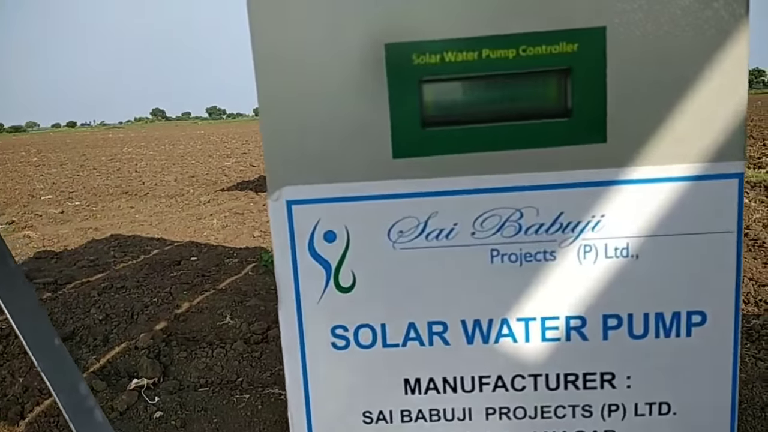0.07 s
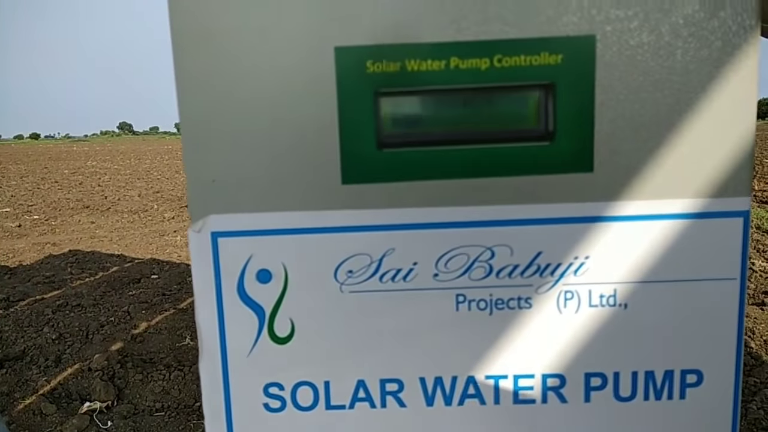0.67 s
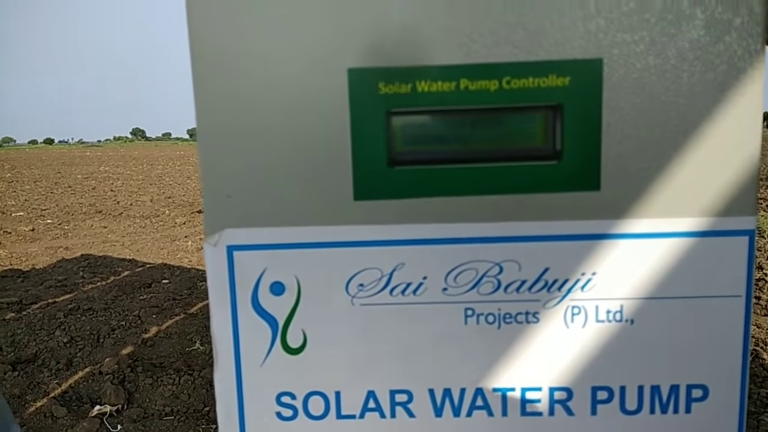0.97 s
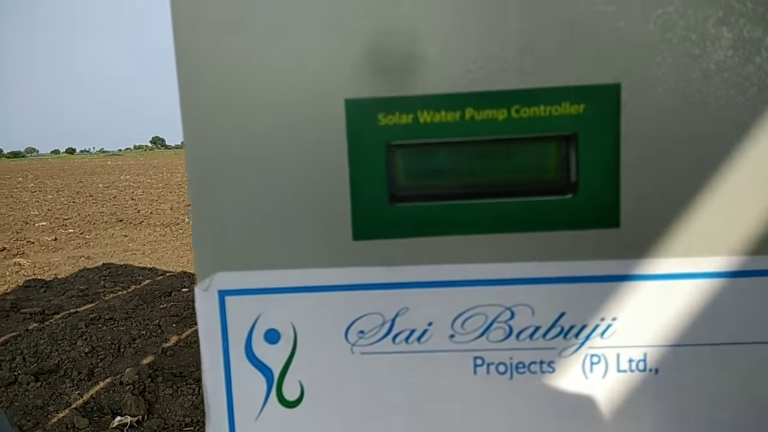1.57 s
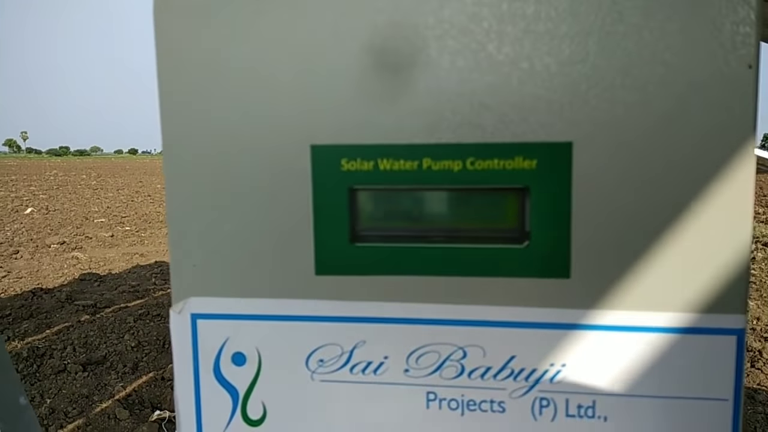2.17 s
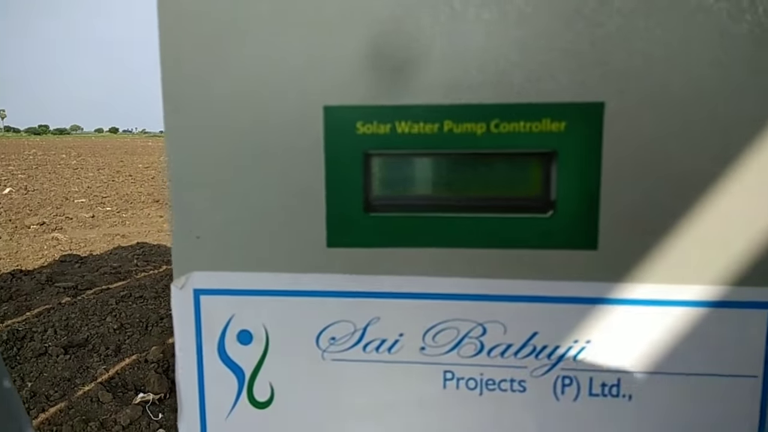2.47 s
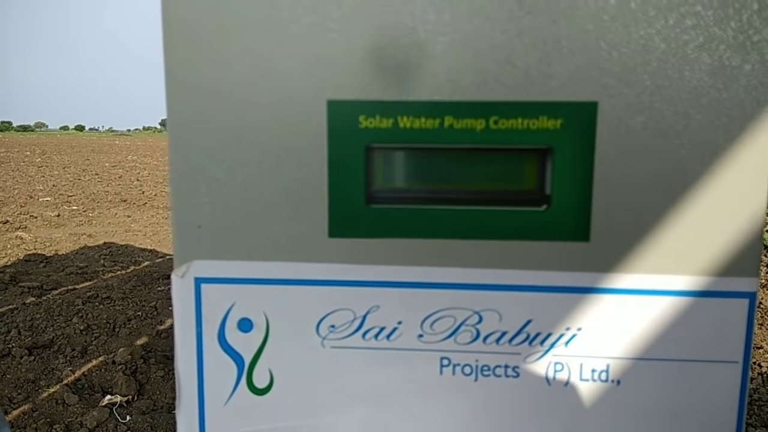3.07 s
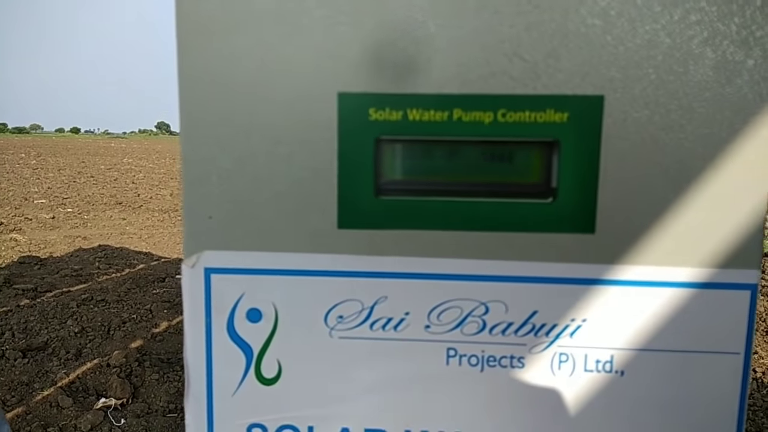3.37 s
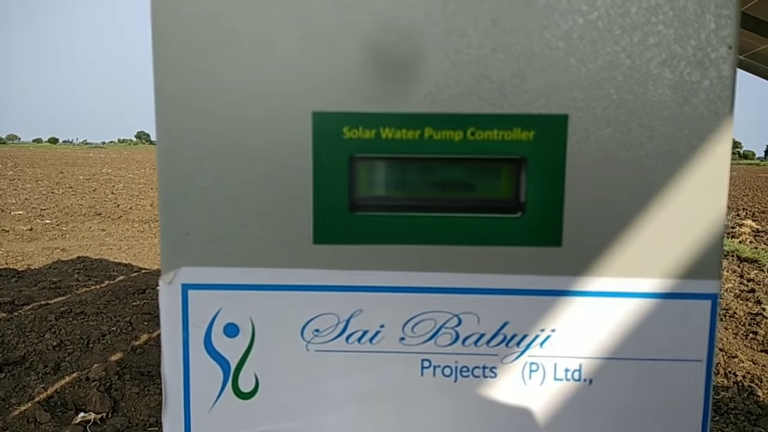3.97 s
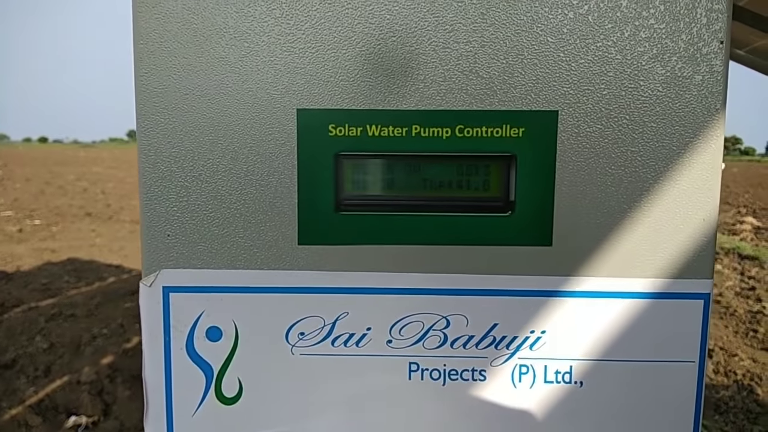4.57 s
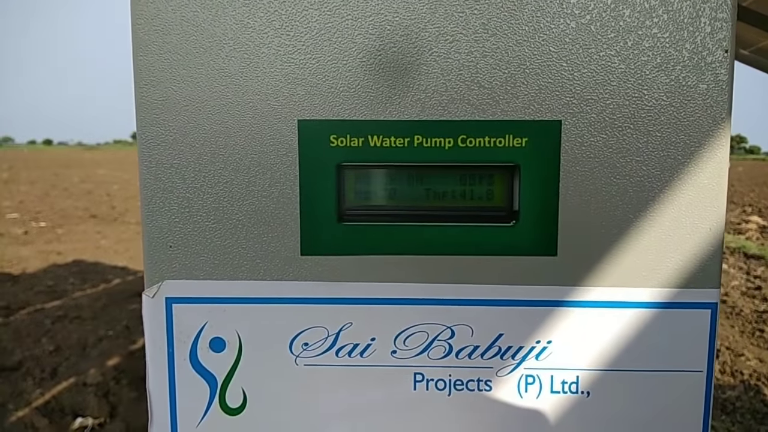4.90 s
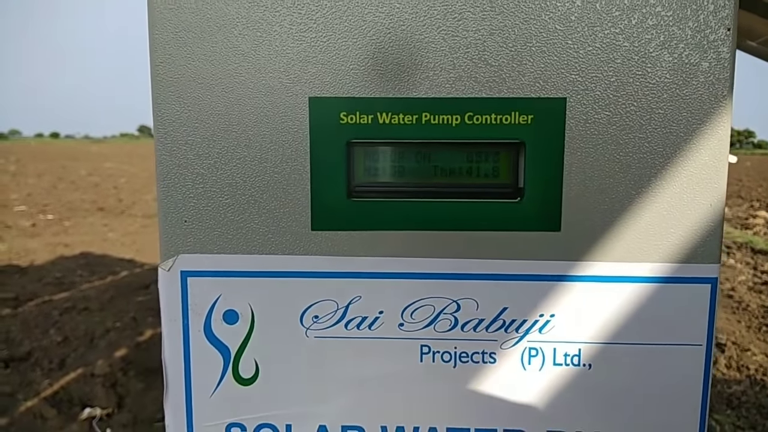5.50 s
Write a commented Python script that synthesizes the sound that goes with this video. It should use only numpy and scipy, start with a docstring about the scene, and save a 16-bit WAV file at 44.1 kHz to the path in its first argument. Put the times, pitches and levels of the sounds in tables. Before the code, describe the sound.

Wind buffets the microphone in irregular low rumbles and short thumps, mostly on the left, out in an open field. Alongside it, a pump's stream of water runs without a break, bubbling, plopping and spraying onto the soil. Heard from beside a metal cabinet, the water sounds slightly hollow, and the electronics whine faintly. The gurgle eases a little toward the end.

```python
"""A gurgling rush of water gushes from a pump's outlet pipe and spatters on the ground in an open field.
Bubbles ring, drops tick and lumps of water slap down. The microphones stand close to a metal control
cabinet, whose hollows colour the rush and whose electronics whine faintly.
Gusts of wind rumble and thump on the two microphone openings (ports), the left one harder."""
import sys
import numpy as np
from scipy import signal
from scipy.fft import rfft, irfft
from scipy.io import wavfile
from scipy.ndimage import uniform_filter1d, map_coordinates

SR = 44100
rng = np.random.default_rng(int(sys.argv[2]) if len(sys.argv) > 2 else 0)


def digitize_waveform(pressure):
    """Quantize a signal to 16-bit integers and store it at the path in sys.argv[1].

    Rows of a 2-D input are taken as channels; values are limited to [-1, 1].
    """
    field = np.atleast_2d(pressure).T
    bounded = np.clip(field, -1, 1)
    quanta = np.round(bounded * 32767).astype(np.int16)
    wavfile.write(sys.argv[1], SR, quanta)


N = 244314
TIME = np.arange(N) / SR
FREQ = np.fft.rfftfreq(N, 1 / SR) + 1e-3

# the slowly changing strength of the stream: t/s, relative gurgle level/dB, relative spray level/dB
FLOW = [(0, 6, 5.5), (0.75, 6.5, 2), (1.1, 7.5, 3.5), (1.85, 8.5, 4.5), (2.14, 8.5, -0.5), (2.55, 10.5, 2),
        (2.95, 7, 2.5), (3.75, 9, 5), (4.0, 6, 1.5), (4.8, 3, 4), (5.07, 2.5, 0), (5.35, 5.5, 5.5),
        (5.54, 3.5, 2)]
# lumps of water slapping down: t/s, level over the spray/dB, decay/s
SLAPS = [(0.035, 6.5, 0.0073), (0.33, 0, 0.061), (1.648, 7.5, 0.022), (2.195, 6, .005), (2.205, 5, 0.096),
         (2.494, 8.5, 0.009), (2.642, 6.5, 0.0054), (2.857, 7, 0.011), (3.261, 6.5, 0.039),
         (4.234, -2, 0.0038), (4.519, 9, 0.0036), (4.553, 13, 0.0025), (5.124, 6.5, 0.0045),
         (5.178, 9, 0.0081), (5.286, 15.5, 0.0049), (5.381, 4, 0.0065)]
# the largest pockets of air the stream gulps: t/s, level over the gurgle/dB, f/Hz, decay/s
AIR_POCKETS = [(0.148, 13.5, 1980, 0.0095), (0.934, 12, 1670, 0.0062), (1.046, 13, 2700, 0.011),
               (1.08, 16.5, 2950, 0.0094), (1.078, 21, 890, .009), (1.262, 12.5, 1650, 0.01),
               (1.288, 15, 860, .008), (1.484, 12, 3220, 0.0086), (1.673, 8.5, 1900, 0.085),
               (2.018, 15, 1200, .012), (2.023, 12, 2270, 0.013), (2.08, 7, 2000, 0.038),
               (2.142, 11, 1650, 0.0078), (2.194, 20.5, 2010, 0.0054), (2.215, 16.5, 3200, 0.017),
               (2.222, 13.5, 970, .012), (2.355, 16, 1685, 0.0094), (2.495, 14.5, 1890, 0.013),
               (2.457, 14, 905, .009), (2.527, 11, 960, .012), (2.587, 13.5, 1800, 0.0059),
               (2.643, 15.5, 2900, 0.0082), (2.852, 11.5, 3160, 0.014), (3.039, 18, 1770, 0.0036),
               (3.038, 19, 1070, .008), (3.07, 19, 917, .011), (3.158, 15, 895, 0.019),
               (3.55, 8, 3470, 0.0033), (3.59, 12, 2810, 0.0048), (3.702, 9, 1680, 0.0081),
               (3.771, 18, 955, .008), (4.094, 12.5, 1660, 0.02), (4.106, 11, 3160, 0.03),
               (4.176, 11.5, 3260, 0.0098), (4.233, 15.5, 3140, 0.0075), (4.288, 21, 923, 0.011),
               (4.285, 14, 1850, 0.01), (4.425, 13, 1630, 0.011), (4.574, 22, 1905, 0.0094),
               (4.772, 17, 1600, 0.034), (4.786, 16.5, 3250, 0.013), (4.835, 11, 3260, 0.017),
               (4.976, 8, 2830, 0.025), (5.017, 18, 836, 0.022), (5.287, 20, 800, .011),
               (5.378, 14, 3260, 0.017), (5.457, 18, 863, .008)]


def gain_of(db):
    """Turns decibels into a factor on the amplitude."""
    return 10 ** (np.asarray(db) / 20)


def evened(x):
    """Scales a signal to an average power of 1."""
    return x / np.sqrt(np.mean(x ** 2) + 1e-20)


def curves(rows):
    """Joins the points in each column of a table by straight lines in time."""
    times, *columns = np.transpose(rows)
    return [np.interp(TIME, times, column) for column in columns]


def shaped(x, gain):
    """Filters a signal with one gain for each frequency."""
    return irfft(rfft(x) * gain, N)


def noise(spectrum):
    """Noise of power 1 with the given spectrum."""
    return evened(shaped(rng.standard_normal(N), spectrum))


def wobble(rate_hz):
    """A smooth random wiggle, up to about the given rate."""
    return noise(1 / (1 + (FREQ / rate_hz) ** 2))


def bell(offset, width):
    """A bell-shaped hump, 1 high where the offset is 0."""
    return np.exp(-.5 * (offset / width) ** 2)


def bands(centres):
    """Overlapping band filters whose powers add up to 1."""
    return [np.sqrt(np.interp(np.log(FREQ), np.log(centres), row)) for row in np.eye(len(centres))]


def hits(per_s, spread_db):
    """Clicks of random size at random moments."""
    return (rng.random(N) < per_s / SR) * gain_of(spread_db * np.clip(rng.standard_normal(N), -2, 2))


def burst(start, db, decay_s, rise_s):
    """Power of one splash: a quick rise, then a fade."""
    age = np.maximum(TIME - start, 0)
    return gain_of(db) ** 2 * (1 - np.exp(-age / rise_s)) * np.exp(-age / decay_s)


def water(steady_share=0.099, gurgle_top_hz=3400):
    """The rush: spurts make all noise bands swell together, while drops crackle in each band alone."""
    gurgle_db, spray_db = curves(FLOW)
    slosh = wobble(rate_hz=19.0)  # the stream sloshes unevenly
    gurgle_db, spray_db = gurgle_db + 1.5 * slosh, spray_db + 0.6 * slosh
    spurts, slap_power = splashes(per_s=95, decay_s=0.0053), slaps()
    gulp_power, gulp_hz = gulps()
    hiss_power, hiss_hz = sheets()
    centres, ports = np.geomspace(500, 14000, 12), np.zeros((2, N))
    for hz, band in zip(centres, bands(centres)):
        fine = 1 / (1 + (gurgle_top_hz / hz) ** 4)  # 0 for gurgling bubbles, 1 for fine spray
        drops = splashes(per_s=150, decay_s=0.006)
        together = 0.43 * (0.89 + 0.086 * fine)
        crackle = together * spurts + (1 - together) * drops
        power = steady_share + (1 - steady_share) * crackle + fine * slap_power
        power += bell(np.log2(hz / gulp_hz), 0.27) @ gulp_power
        power += bell(np.log2(hz / hiss_hz), 0.5) @ hiss_power
        left, other = shaped(rng.standard_normal((2, N)), band)
        alike = 0.65 * (1 - fine)  # the long waves of the gurgle reach both ports alike
        right = alike * left + np.sqrt(1 - alike ** 2) * other
        flow = gain_of(fine * spray_db + (1 - fine) * gurgle_db)
        ports += np.array([left, right]) * np.sqrt(np.maximum(power, 0)) * flow
    return ports + bubbles() * gain_of(gurgle_db / 2 - 12) + droplets() * gain_of(spray_db - 13) + plops()


def splashes(per_s, decay_s, spread_db=4.5, rise_s=0.002):
    """Power of many random splashes, each rising quickly and dying away; about 1 on average."""
    turn = 2j * np.pi * FREQ
    rise_and_fade = 1 / ((1 + turn * decay_s) * (1 + turn * rise_s))
    power = np.maximum(shaped(hits(per_s, spread_db) ** 2, rise_and_fade), 0)
    # keeps the random splashing about equally loud over each seventh of a second
    return power / (uniform_filter1d(power, size=SR // 7, mode="wrap") + 1e-12)


def bubble_ring(hz, cycles, glide, samples):
    """One trapped bubble rings for a few cycles and rises in pitch as it nears the surface."""
    t = np.arange(samples) / SR
    age = t * hz / cycles
    return np.sin(2 * np.pi * hz * t * (1 + glide * age / 2)) * np.exp(-age) * (1 - np.exp(-t * hz))


def bubbles(per_s=130):
    """Bubbles of many sizes ring at random moments."""
    pitches_hz, out = np.geomspace(600, 3500, 24), np.zeros(N)
    for hz in pitches_hz:
        births = hits(per_s / len(pitches_hz), spread_db=4)
        out += signal.oaconvolve(births, bubble_ring(hz, cycles=9, glide=0.06, samples=3000))[:N]
    return evened(out)


def droplets(above_hz=6000):
    """Single fine drops tick through the spray."""
    return evened(shaped(hits(per_s=260, spread_db=4), 1 / (1 + (above_hz / FREQ) ** 4)))


def cabinet(ports):
    """The cabinet's hollows favour some pitches of the water, different ones at each port."""
    # resonances at each port: f/Hz, width/Hz, level at the first place/dB, level at the second place/dB
    left_peaks = [(550, 162, -8, -8.5), (922, 110, -21.5, -17.5), (1087, 64, -32, -25), (1398, 97, -9, -16),
                  (1517, 196, -9, -13.5), (1823, 118, -8, -10.5), (1984, 147, -10, -34),
                  (2144, 96, -11.5, -34), (2360, 160, -14, -23), (2621, 82, -15, -9.0),
                  (2700, 310, -18, -34), (3370, 140, -44.0, -19.5), (3493, 144, -13, -22.5),
                  (3800, 110, -44.0, -26), (4170, 36, -17.5, -44.0), (4300, 120, -15, -27),
                  (4960, 81, -22, -32.0), (4840, 70, -28.0, -44.0), (5060, 94, -18, -12),
                  (5170, 156, -7, -31), (5270, 280, -19.0, -42), (5745, 64, -10, -14),
                  (6020, 86, -7, -28.5), (6550, 260, -35, -35), (6600, 130, -10, -22.5),
                  (7100, 73, -8, -44.0), (7260, 138, -7.0, -7), (7650, 230, -8, -41.5),
                  (8090, 224, -4.5, -9.5), (8640, 240, -6.5, -6.5), (9210, 520, -6.5, -10),
                  (9610, 340, -10.5, -44.0), (9926, 390, -7.5, -2.0), (10000, 150, -10, -7),
                  (10460, 250, -20.5, -18), (11390, 240, -2.5, -3.5), (11880, 214, 2, 0),
                  (12400, 210, -9.0, -20), (12790, 270, -3.5, -4.5), (13300, 150, -7, -14.5),
                  (14310, 540, -14, -26), (14670, 260, -5, -21.0), (15390, 410, -6.5, -35)]
    right_peaks = [(497, 84, -4.5, -9), (874, 137, -17.5, -14.5), (1020, 47, -14.5, -13),
                   (1160, 110, -15, -27.5), (1573, 116, -11.5, -12), (1950, 130, -29, -45),
                   (2290, 84, -31, -23.5), (2470, 71, -33, -28.5), (2690, 56, -24, -33.5),
                   (3020, 140, -28, -23.5), (3318, 82, -16, -13.5), (3600, 280, -41, -23.5),
                   (4060, 148, -12.5, -7.5), (4505, 184, -14.5, -9), (4730, 187, -10, -7.5),
                   (4990, 160, -16.5, -20), (5380, 120, -16, -22), (5230, 120, -30.0, -24),
                   (5920, 240, -23, -25), (6540, 340, -34, -29), (7500, 340, -30, -29),
                   (8100, 640, -29.5, -32), (8800, 390, -31, -29), (8900, 150, -17, -25),
                   (10030, 240, -2, -11.5), (10280, 280, -4.5, -3.5), (10660, 330, -3.5, -9.5),
                   (11300, 410, -29, -28), (12510, 500, -44.0, -38)]
    return np.array([gain_of(-29) * colour(ports[0], left_peaks, floor_db=-47),
                     gain_of(-30.5) * colour(ports[1], right_peaks, floor_db=-43)])


def colour(x, peaks, floor_db):
    """Peaks and dips in the tone change height as the microphones move from one place to another."""
    # the microphones drift along the cabinet: t/s, share of the way to the second place
    drift = [(1.2, 0.064), (3.6, 1)]
    # dips where the cabinet's echo cancels the direct rush:
    # f/Hz, width/Hz, gain at the first place/dB, gain at the second place/dB
    dips = [(2860, 260, -1, 2), (3850, 180, -25, -8), (5560, 190, -14, -5), (6250, 200, -9, -5)]

    def hump(hz, width):
        return np.exp(-np.log(2) * np.minimum((2 * (FREQ - hz) / width) ** 2, 20))

    way, heard = curves(drift)[0], 0
    for place, share in enumerate([1 - way, way]):
        power = sum(hump(hz, width) * gain_of(db[place]) ** 2 for hz, width, *db in peaks)
        dip_db = sum(hump(hz, width) * db[place] for hz, width, *db in dips)
        heard += share * shaped(x, np.sqrt(gain_of(floor_db) ** 2 + power) * gain_of(dip_db))
    return heard


def warble(ports, sway_s=0.000451, patch_db=4.0, patch_hz=110, patch_s=0.034, fades_hz=9000):
    """The water's sound sways slightly in pitch, with a faint random warble in narrow bands."""
    read_at = (TIME + sway_s * wobble(rate_hz=1.146)) * SR
    swayed = np.array([map_coordinates(port, [read_at], order=5, mode="mirror") for port in ports])
    hz, t, spectra = signal.stft(swayed, SR, nperseg=512, noverlap=384)
    # blur random numbers across pitch and along time into soft patches
    across, along = np.fft.fftfreq(len(hz), hz[1])[:, None], np.fft.fftfreq(len(t), t[1])
    blur = np.exp(-(across * patch_hz) ** 2 - (2 * along * patch_s) ** 2)
    patches = evened(np.fft.ifft2(np.fft.fft2(rng.standard_normal(spectra.shape[1:])) * blur).real)
    gain = gain_of(patch_db * np.minimum(patches, 2) / (1 + (hz[:, None] / fades_hz) ** 2))
    gain /= np.sqrt(np.mean(gain ** 2, axis=1, keepdims=True))
    return signal.istft(spectra * gain, SR, nperseg=512, noverlap=384)[1][:, :N]


def airflow(port):
    """Gusts swell and fade on top of the breeze; gives their force in dB and a factor on their pitch."""
    # the breeze with its lulls: t/s, left level/dB, right level/dB
    breeze = [(0, -34, -47), (0.78, -42, -42), (0.9, -30, -52), (1.19, -40.5, -43.5), (1.36, -37, -42),
              (1.95, -31, -48.5), (2.15, -51.5, -55.5), (2.31, -30.5, -50), (2.55, -37.5, -40),
              (2.88, -30.5, -54), (3.15, -34, -44), (3.7, -31, -46.5), (4.03, -31.5, -50),
              (4.2, -39.5, -51), (4.73, -42.5, -51.5), (4.91, -31, -57), (5.3, -44, -50),
              (5.54, -39.5, -62)]
    # gusts: peak t/s, half length/s, left level/dB, right level/dB, factor on how high the pitch reaches
    gusts = [(0.037, 0.037, -29, -32.5, 0.66), (0.414, 0.064, -35, -31.5, 1.28),
             (0.556, 0.026, -45, -25.5, 0.93), (0.656, 0.053, -26, -38, 1.14),
             (1.02, 0.02, -24.5, -41, 1.8), (1.084, 0.017, -33, -26.5, 0.89),
             (1.5, 0.05, -26.5, -31.5, 1.07), (1.661, 0.018, -53, -25, 0.83),
             (1.805, 0.019, -34, -33, 1.13), (2.454, 0.02, -28.5, -40, 1.44), (2.67, 0.015, -33, -53, 1.6),
             (3.279, 0.036, -26, -45, 1.1), (3.404, 0.04, -22.5, -35.5, 1.05),
             (3.55, 0.011, -82, -26.5, 0.8), (3.826, 0.05, -30, -53, 1.56), (4.353, 0.057, -37, -64, 0.92),
             (5.198, 0.042, -28.5, -47, 0.94), (5.425, 0.026, -26.5, -66, 0.38)]
    power = gain_of(curves(breeze)[port]) ** 2
    reach = 0.9 * power
    for peak_s, half_s, *db, factor in gusts:
        gust = gain_of(db[port]) ** 2 * bell(TIME - peak_s, half_s)
        power += gust
        reach += factor * gust
    return 10 * np.log10(power), reach / power


def wind(port, corner_hz, slope, brighten, flutter_db, gain_db, low_cut_hz, rumble_db, body_hz):
    """Air swirls at one port: the harder it blows, the smaller the swirls and the higher they sound."""
    flutter = noise(1 / (1 + (FREQ / 36) ** 2) / (1 + (9 / FREQ) ** 4))  # tens of swirls a second
    force_db, pitch_factor = airflow(port)
    force_db += flutter_db * np.clip(flutter, -2, 2)
    reach_hz = corner_hz * pitch_factor * gain_of(brighten * (force_db + 20))
    # the microphone passes little of the deepest rumble
    low_cut = 1 / np.sqrt(1 + (low_cut_hz / FREQ) ** 14) + gain_of(rumble_db) / (1 + (35 / FREQ) ** 4)
    centres, sound, power = np.geomspace(60, 4000, 13), 0, 0
    for hz, band in zip(centres, bands(centres)):
        spectrum = band * low_cut / (1 + (FREQ / 2500) ** 4)
        treble_loss = np.sqrt((1 + (hz / body_hz) ** 2) * (1 + (hz / reach_hz) ** slope))
        size = np.linalg.norm(spectrum) / treble_loss
        sound += size * noise(spectrum)
        power += size ** 2
    return gain_of(force_db + gain_db) * sound / np.sqrt(power)


def whine(waver_hz=3, flicker_db=2):
    """The electronics that drive the pump give off thin, slightly wavering tones."""
    # tones of the pump drive: f/Hz, left level/dB, right level/dB
    tones = [(1797, -54.5, -84), (1960, -62, -73.5)]
    out = np.zeros((2, N))
    for hz, left_db, right_db in tones:
        turns = np.cumsum(hz + waver_hz * wobble(rate_hz=5.55)) / SR
        flicker = gain_of(flicker_db * wobble(rate_hz=9.6))
        out += gain_of([[left_db], [right_db]]) * flicker * np.sin(2 * np.pi * turns)
    return out


def slaps():
    """Power of the lumps of water slapping down, relative to the spray."""
    return sum(burst(*row, rise_s=0.00028) for row in SLAPS)


def spatter(gain_db=-52, centre_hz=7000, octaves=0.61, brief_s=0.027):
    """The briefest, hardest slaps also throw a broad, bright spatter that the cabinet does not colour."""
    spectrum = bell(np.log2(FREQ / centre_hz), octaves)
    power = sum(burst(start, db, decay_s, rise_s=0.00083) / (1 + (decay_s / brief_s) ** 2)
                for start, db, decay_s in SLAPS)
    return gain_of(gain_db) * np.sqrt(power) * np.array([noise(spectrum), noise(spectrum)])


def gulps(small_count=6, small_db=7, low_hz=880, high_hz=3500, small_decay_s=0.003):
    """Power and pitch of each gulp of air: the large ones, and smaller ones at random."""
    small = [(when * N / SR, small_db, low_hz * (high_hz / low_hz) ** pitch, small_decay_s)
             for when, pitch in rng.random((small_count, 2))]
    rows = AIR_POCKETS + small
    powers = [burst(start, db, decay_s, rise_s=0.0017) for start, db, _, decay_s in rows]
    return np.array(powers), np.array(rows)[:, 2]


def plops(count=5, octaves=0.225, db_per_octave=2):
    """Each large gulp breaks into a few bubbles that ring at their own pitch and chirp upwards."""
    out, gurgle_db = np.zeros((2, N)), curves(FLOW)[0]
    for start, db, centre_hz, decay_s in AIR_POCKETS:
        flow_db = np.interp(start, TIME, gurgle_db) / 2
        size = gain_of(db - 15 + flow_db + db_per_octave * np.log2(centre_hz / 2000))
        for k, (pitch, side) in enumerate(rng.uniform(-0.96, 1, (count, 2))):
            ring = bubble_ring(centre_hz * 2 ** (octaves * pitch), cycles=10, glide=0.032, samples=4000)
            left_right = gain_of([[2 * side], [1 - 2 * side]])
            first = round((start + 2 * decay_s * k / count) * SR)
            part = out[:, first:first + len(ring)]
            part += size * np.exp(-k / count) * left_right * ring[:part.shape[1]]
    return out


def wind_thumps(octaves=0.48, low_cut_hz=115, top_ratio=2.2, samples=4096):
    """A strong swirl of air hits one port with a low thump of a few uneven cycles."""
    # the strongest swirls: t/s, level/dB, centre f/Hz, half length/s, port (0 left, 1 right)
    swirls = [(0.366, -20, 172, 0.0032, 1), (0.396, -24.5, 426, 0.0048, 0), (0.563, -25, 407, 0.017, 0),
              (0.58, -18.5, 199, 0.0026, 1), (0.592, -23.5, 500, 0.0094, 0), (0.6, -11.5, 227, 0.0053, 0),
              (0.652, -17.5, 386, 0.004, 0), (0.673, -31, 490, 0.0047, 0), (0.691, -12.5, 350, 0.0038, 0),
              (0.991, -17, 147, 0.006, 1), (0.987, -20.5, 256, .005, 0), (0.998, -12, 445, 0.0033, 0),
              (0.999, -23, 870, 0.0035, 0), (1.015, -17, 430, 0.0065, 0), (1.054, -47, 457, 0.0051, 0),
              (1.327, -20.5, 300, 0.0026, 0), (1.43, -29.5, 438, 0.018, 0), (1.502, -22.5, 497, 0.0062, 0),
              (1.621, -18.5, 209, 0.0064, 0), (1.674, -17, 177, 0.0034, 1), (1.765, -19, 410, 0.012, 0),
              (2.299, -29, 282, 0.007, 0), (2.467, -23.5, 433, 0.007, 0), (2.599, -16.5, 378, 0.0033, 0),
              (2.633, -28, 435, 0.01, 0), (2.684, -25.5, 260, 0.014, 0), (3.075, -24.5, 427, 0.0046, 0),
              (3.166, -25, 358, 0.0046, 0), (3.297, -16.5, 182, 0.0047, 1), (3.309, -22, 215, 0.003, 0),
              (3.391, -18, 330, 0.0042, 0), (3.374, -32, 513, 0.0039, 0), (3.411, -17, 354, 0.0055, 0),
              (3.47, -18, 278, 0.0039, 0), (3.479, -26, 610, 0.0033, 0), (3.585, -22.5, 312, 0.0038, 0),
              (3.658, -20, 244, 0.0056, 0), (3.701, -24.5, 430, 0.0091, 0), (3.802, -22, 500, 0.0036, 0),
              (3.947, -22.5, 270, 0.0095, 0), (4.329, -22, 253, 0.0039, 0), (4.366, -21, 246, 0.0044, 0),
              (4.841, -34, 272, 0.0047, 0), (5.038, -26, 404, 0.0031, 0), (5.157, -20.5, 362, 0.0036, 0),
              (5.196, -22.5, 420, 0.0034, 0), (5.4, -20.5, 180, 0.0036, 0), (5.472, -25.5, 290, 0.0057, 0)]
    out = np.zeros((2, N))
    t, f = (np.arange(samples) - samples // 2) / SR, np.fft.rfftfreq(samples, 1 / SR) + 1
    for peak_s, db, hz, half_s, port in swirls:
        swell = bell(t, half_s)
        spectrum = bell(np.log2(f / hz), octaves)
        spectrum /= (1 + (low_cut_hz / f) ** 6) * (1 + (f / hz / top_ratio) ** 10)
        thump = swell * irfft(rfft(rng.standard_normal(samples)) * spectrum)
        thump *= gain_of(db) * np.linalg.norm(swell) / np.linalg.norm(thump)
        out[round(port)] += np.interp(TIME, peak_s + t, thump)
    return out


def sheets():
    """Power and pitch of the short hisses as small sheets of water break up."""
    # breaking sheets: t/s, level over the spray/dB, centre f/Hz
    breakups = [(0.7, 8.5, 5160), (1.085, 5, 5030), (1.308, 9, 9000), (2.26, 15.5, 12000),
                (2.589, 10.5, 10000), (3.91, 9, 4460), (4.174, 9, 6000), (4.366, 1, 10000),
                (4.639, 9, 4500), (4.712, 9, 11000), (4.986, 12, 8000), (5.16, 9, 11000), (5.465, 7, 11000)]
    powers = [burst(start, db, decay_s=0.0058, rise_s=0.00036) for start, db, _ in breakups]
    return np.array(powers), np.array(breakups)[:, 2]


def scene():
    """Water, whine and wind; both ports meet the same gusts, each with its own swirls."""
    left = wind(port=0, corner_hz=655, slope=9.1, brighten=0.34, flutter_db=3.0, gain_db=0.47,
                low_cut_hz=136, rumble_db=-36, body_hz=263)
    right = wind(port=1, corner_hz=264, slope=7.9, brighten=0.21, flutter_db=4.0, gain_db=2.5,
                 low_cut_hz=120, rumble_db=-43, body_hz=259)
    return warble(cabinet(water())) + spatter() + whine() + np.array([left, right]) + wind_thumps()


def record(dry):
    """Cuts off the very highest treble."""
    top_hz = 15750
    low_pass = signal.firwin(511, top_hz, window=("kaiser", 9), fs=SR)
    return signal.oaconvolve(dry, low_pass[None], "same")


dry = scene()
out = record(dry)
digitize_waveform(out)
```